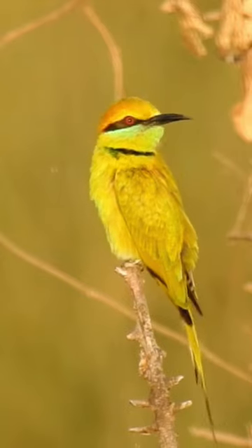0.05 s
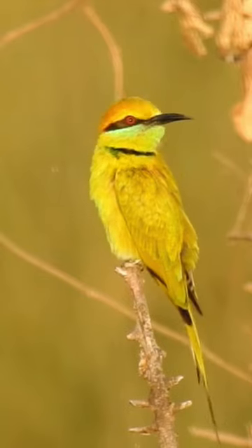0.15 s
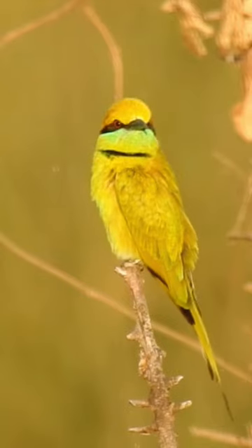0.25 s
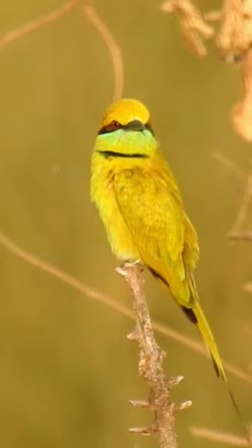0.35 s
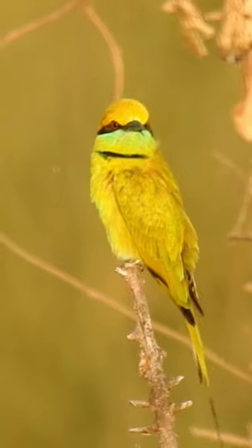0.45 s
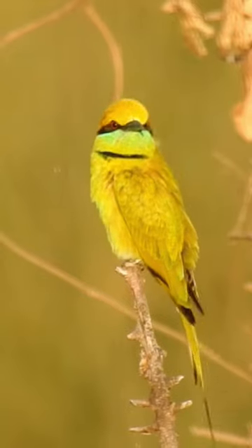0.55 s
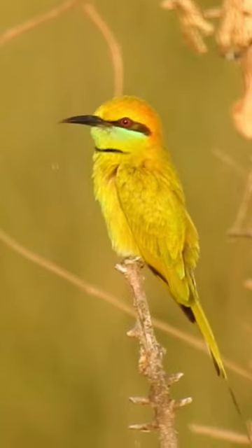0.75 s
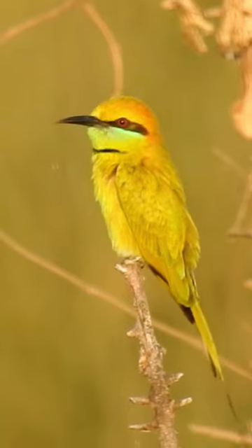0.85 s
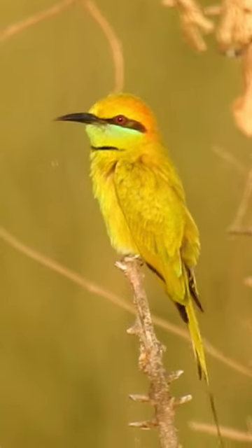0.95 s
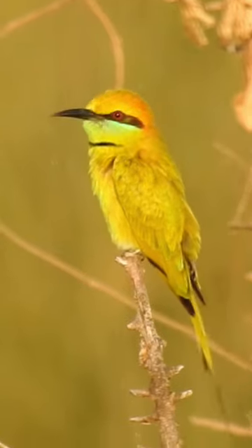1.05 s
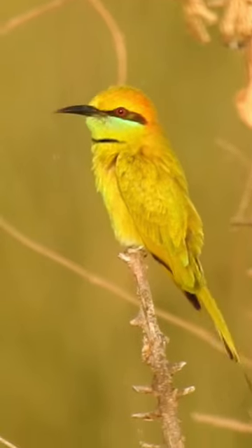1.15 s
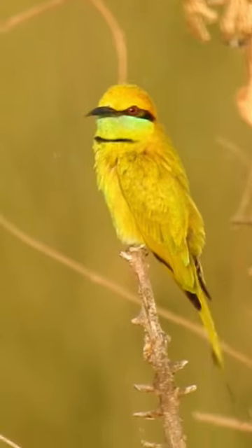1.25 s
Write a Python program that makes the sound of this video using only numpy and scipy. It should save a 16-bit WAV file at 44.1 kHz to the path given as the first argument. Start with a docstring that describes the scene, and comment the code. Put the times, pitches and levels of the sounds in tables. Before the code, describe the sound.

Outdoors, a cricket starts a high-pitched buzz, grows louder and cuts off suddenly. Gusts thump softly against the microphone, and distant crickets, faint chips from small birds and a light hiss carry on underneath.

```python
"""A cricket in the wind

A cricket scrapes its wings about 160 times a second, each stroke a short falling note near 7 kHz.
Its trill swells, slows and stops dead. Others trill farther off, and small birds chip faintly.
Behind them are a steady hiss, a breeze in the scrub, rustling grass and snapping stems.
Wind buffets the microphone with rumbles and soft thumps; faint ticks sound alongside."""
import sys
import numpy as np
from scipy import signal
from scipy.fft import rfft, irfft, next_fast_len
from scipy.io import wavfile
from scipy.ndimage import map_coordinates

SR = 44100
rng = np.random.default_rng(int(sys.argv[2]) if len(sys.argv) > 2 else 0)


def dump(signal):
    """Clip the signal to [-1, 1] and save it as 16-bit WAV at the path in sys.argv[1]."""
    limited = np.clip(np.atleast_2d(signal).T, -1, 1)
    pcm = np.round(limited * 32767).astype(np.int16)
    wavfile.write(sys.argv[1], SR, pcm)


N = 57330  # 1.3 seconds
SIDES = np.array([[1], [-1]])  # plus for left, minus for right


def amp(db):
    """Turn decibels into a number to multiply by."""
    return 10 ** (np.asarray(db) / 20)


def unit(x):
    """Scale a sound to an average strength (rms) of 1."""
    return x / np.sqrt(np.mean(x ** 2) + 1e-20)


def clock():
    """The time of each sample, in seconds."""
    return np.arange(N) / SR


def curves(rows):
    """Join a table's points with straight lines: one curve for each column after the time."""
    times, *columns = np.transpose(rows)
    return [np.interp(clock(), times, column) for column in columns]


def wobble(rate):
    """A smooth curve through `rate` random values a second."""
    return map_coordinates(rng.standard_normal(4096), [clock() * rate], mode="wrap")


def filtered(x, response):
    """Multiply each frequency in a sound by response(hz)."""
    size = next_fast_len(N + SR // 4)
    return irfft(rfft(x, size) * response(np.fft.rfftfreq(size, 1 / SR)), size)[..., :N]


def spread(mid, side, alike):
    """Mix two unrelated signals into left and right; alike = 1 makes both sides the same."""
    turn = np.arccos(np.clip(alike, -1, 1)) / 2
    return np.cos(turn) * mid + SIDES * np.sin(turn) * side


def noise(colour, alike):
    """Stereo noise of strength 1; the colour table says which frequencies are strong or weak."""
    freqs, db = np.transpose(colour)
    white = spread(*rng.standard_normal((2, N)), alike)
    return unit(filtered(white, lambda hz: amp(np.interp(np.log(hz + 1), np.log(freqs), db))))


def echoes(x, fade_s):
    """Many tiny echoes off plants, together as strong as the sound; they drop 60 dB in fade_s."""
    t = np.arange(SR // 8) / SR
    tail = rng.standard_normal((2, len(t))) * amp(-60 * t / fade_s)
    return unit(signal.fftconvolve(x[None], tail, axes=1)[:, :N]) * np.std(x)


def hiss():
    """A faint, steady hiss."""
    # tone of the hiss: f/Hz, level/dB
    colour = [(100, -33), (1000, -0.5), (2500, -0.5), (5000, 4.5), (6500, 4), (8500, -5), (10500, -2),
              (13000, -10.5), (15500, -15.5)]
    return amp(-58) * noise(colour, alike=0.067)


def breeze():
    """Air moving through the scrub makes a soft, wavering rush."""
    # strength of the breeze: t/s, level/dB
    loudness = [(0, -53.5), (.1, -57), (.2, -59), (.33, -66), (.42, -56.5), (.55, -51), (.72, -52),
                (.9, -51), (1.05, -53.5), (1.3, -52.5)]
    # its tone: f/Hz, level/dB
    colour = [(25, -15), (90, -11), (135, 4), (200, -0.5), (330, -10), (700, -11.5), (1700, -18),
              (2200, -30.5), (5000, -46)]
    return amp(curves(loudness)[0] + wobble(29.9)) * noise(colour, alike=0.42)


def rustle():
    """Dry grass rustles: noise with a quick flicker."""
    # strength of the rustle: t/s, level/dB
    loudness = [(0, -60.5), (.12, -60.5), (.19, -79), (.36, -71), (.6, -75.5), (1.05, -89), (1.1, -59),
                (1.15, -74), (1.3, -74)]
    # its tone: f/Hz, level/dB
    colour = [(300, -26), (900, 1.5), (1500, 0.5), (3000, 1), (6000, -22), (14000, -20)]
    return amp(curves(loudness)[0] + 1.5 * wobble(120)) * noise(colour, alike=0.61)


def snaps():
    """Dry stems snap faintly, each a tiny burst of noise."""
    # snapping stems: t/s, level/dB
    stems = [(0.229, -46.5), (0.636, -48), (0.763, -52.5), (.913, -54), (.992, -49), (1.097, -51.5)]
    # their tone: f/Hz, level/dB
    colour = [(1000, 5), (3000, -1.5), (5200, -1), (7000, -8), (14000, -35)]
    t, fade_s = clock(), 0.013
    bursts = sum(amp(db - 60 * np.abs(t - start) / fade_s) * (t >= start) for start, db in stems)
    return bursts * noise(colour, alike=0.5)


def swell():
    """A deep swell of air presses on both microphone openings almost equally."""
    # strength of the swell: t/s, level/dB
    loudness = [(0, -54), (.16, -50.5), (.21, -58), (.28, -50.5), (.44, -59), (.5, -65.5), (1.3, -72.5)]
    # its tone: f/Hz, level/dB
    colour = [(20, -30), (45, -4.5), (68, -2.5), (100, -12), (200, -25.5), (1000, -59)]
    return amp(curves(loudness)[0]) * noise(colour, alike=0.97)


def rumble():
    """Gusts make a lumpy rumble, different at each microphone opening."""
    # strength of the gusts: t/s, level/dB
    loudness = [(0, -68), (.21, -69), (.26, -43), (.3, -60), (.37, -37.5), (.43, -34), (.455, -44.5),
                (.49, -59), (.56, -80), (.6, -56), (.66, -60), (.72, -46.5), (.79, -52.5), (.87, -52.5),
                (.97, -60), (1.3, -92)]
    # their tone: f/Hz, level/dB
    colour = [(20, -24), (60, 3), (130, -0.5), (250, -1), (420, -11), (700, -25), (2000, -46.5),
              (6000, -51)]
    lumps_db = 3.3 * np.array([wobble(39.5), wobble(39.06)])
    return amp(curves(loudness)[0] + lumps_db) * noise(colour, alike=0.033)


def ticks():
    """Faint, sharp ticks, each gone in about a millisecond."""
    # ticks: t/s, level before dulling/dB, left minus right/dB
    tick_list = [(.2345, -39, -12), (.2455, -41, -12), (.256, -39, -12), (.2665, -40, -12), (.3945, -35, 4),
                 (.4372, -30, 3), (.448, -40, 0), (.7035, -38, -3), (1.092, -47, 0)]
    decay_s, dull_hz = .0004, 5000
    t, out = clock(), np.zeros((2, N))
    for start, db, pan_db in tick_list:
        out += amp(db + pan_db * SIDES / 2) * np.exp(-np.abs(t - start) / decay_s) * (t >= start)
    return filtered(out, lambda hz: 1 / (1 + 1j * hz / dull_hz) ** 2)


def wind_swirls():
    """Each swirl briefly shakes the air in the two openings, a little differently in each."""
    # soft thumps: t/s, half length/s, f/Hz, left level/dB, right level/dB
    thumps = [(.254, 0.017, 126, -30, -24.5), (.275, .009, 138, -26.5, -30.5),
              (.324, 0.0086, 172, -32.5, -63), (.361, 0.0062, 259, -28.5, -39),
              (.376, 0.0085, 232, -29, -34.5), (.378, 0.011, 404.5, -39, -35.5),
              (.401, 0.0079, 160, -22.5, -25), (.41, 0.0052, 180, -50, -26), (.428, 0.016, 137.4, -22, -23),
              (.438, 0.019, 179.7, -33.5, -44), (.49, 0.012, 150, -74, -37), (.595, 0.0036, 163, -58, -25),
              (.614, 0.0036, 194, -29, -46), (.705, 0.0044, 197, -50, -33.5), (.722, 0.015, 135, -32, -66),
              (.734, 0.0032, 152, -30.5, -62), (.864, 0.0051, 173, -35, -36.5),
              (.943, 0.0048, 186, -36, -66), (1.014, 0.0039, 117, -36, -27), (1.155, 0.008, 211, -48, -47)]
    out = np.zeros((2, N))
    for middle, half_length, hz, left_db, right_db in thumps:
        t = clock() - middle
        ragged = .3 * np.array([wobble(260), wobble(260)])
        side_shift = .75 * (SIDES + .5 * rng.standard_normal((2, 1)))
        bump = 1 / np.cosh(np.clip(2.07 * t / half_length, -20, 20))
        out += amp([[left_db], [right_db]]) * bump * np.sin(2 * np.pi * hz * t + ragged + side_shift)
    return out


def birds():
    """Distant birds sing short sliding notes that echo off the plants."""
    # bird notes: t/s, length/s, f/Hz, drop in pitch/Hz, level/dB
    notes = [(.293, .018, 5020, 450, -62), (.31, .018, 5270, 400, -60), (.353, .022, 5270, 850, -59),
             (.393, .024, 5270, 1000, -55), (.58, .028, 6330, 550, -53), (.612, .034, 6200, 250, -51),
             (.653, .024, 6030, 250, -58), (.688, .04, 650, -30, -47), (1.163, .024, 5220, 700, -58),
             (1.203, .016, 5100, 500, -59), (1.241, .022, 5270, 750, -59)]
    out = np.zeros(N)
    for middle, length, hz, fall_hz, db in notes:
        progress = np.clip((clock() - middle) / length, -.5, .5)
        phase = 2 * np.pi * np.cumsum(hz - fall_hz * progress) / SR + 0.34 * wobble(300)
        out += amp(db) * np.cos(np.pi * progress) * np.sin(phase)
    return out + amp(-8) * echoes(out, fade_s=.06)


def wing_strokes(cycles, share, pitch_hz, fall_hz):
    """One wing scrapes a row of teeth on the other, slowing as it goes, so each note falls."""
    stroke = np.round(cycles).astype(int)
    progress = (cycles - stroke) / np.clip(share, .2, 1)  # the note sounds from -0.5 to 0.5
    size, detune, step = rng.standard_normal((512, 3)).T  # no two strokes are quite the same
    vary_db, vary_hz, slip_rad = 0.76, 15.7, 1.05
    arch = np.sin(np.pi * np.clip(progress + .5, 0, 1)).clip(0) ** 1.46
    loudness = arch * amp(vary_db * size[stroke])
    hz = pitch_hz + vary_hz * detune[stroke] - fall_hz * np.clip(progress, -.5, .5)
    phase = 2 * np.pi * np.cumsum(hz) / SR + slip_rad * np.cumsum(step)[stroke]
    return loudness, phase


def far_crickets():
    """Four more crickets scrape their wings, blurred by echoes from the scrub."""
    # each cricket: stroke rate/Hz, f/Hz, drop in pitch/Hz, relative level/dB, left minus right/dB
    singers = [(168, 7540, 650, 0, 3), (177, 7450, 800, -1, -3), (144, 7130, 600, -4, -1),
               (159, 7560, 600, -3, -2)]
    # all of them together: t/s, level/dB
    chorus = [(0, -50), (.08, -55.5), (.16, -52.5), (.38, -50.5), (.5, -56.5), (.8, -56), (.92, -54),
              (1.1, -51.5), (1.24, -50.5), (1.3, -55.5)]
    out = np.zeros((2, N))
    for rate, hz, fall_hz, db, pan_db in singers:
        cycles = np.cumsum(rate * (1 + .015 * wobble(3.9))) / SR + rng.random()
        loudness, phase = wing_strokes(cycles, share=.7, pitch_hz=hz, fall_hz=fall_hz)
        blur = 1.35 * np.array([wobble(200), wobble(200)])
        song = loudness * np.sin(phase + blur + np.array([[0], [np.pi / 2]]))
        out += amp(db + pan_db * SIDES / 2) * (song + amp(4) * echoes(song[0], fade_s=0.036))
    return unit(out) * amp(curves(chorus)[0])


def grit(width_hz=700):
    """The roughness of a scrape: complex numbers that shake a note's strength and phase."""
    return (wobble(2 * width_hz) + 1j * wobble(2 * width_hz)) / np.sqrt(2)


def near_cricket():
    """With more effort the wing strokes grow louder and longer; then the wings stop."""
    # speed of the wings: t/s, stroke rate/Hz
    pace = [(.265, 159.1), (.4, 160.8), (.5, 164.9), (.62, 163.1), (.74, 158.4), (.88, 148.7)]
    # how hard it sings: t/s, level/dB, share of each wing cycle that sounds/0-1
    effort = [(.26, -43.5, 0.57), (.3, -41, .6), (.41, -41, 0.71), (.5, -37.5, 0.85), (.62, -35, 0.85),
              (.73, -35, 0.9), (.79, -32.5, 0.85), (.88, -33.5, 1)]
    # how alike left and right are: t/s, likeness/0-1
    likeness = [(.27, 0.9), (.5, 0.76), (.7, 0.83), (.88, 1)]
    first_stroke_s, stop_s, left_lead_rad = .2643, .8815, 0.57
    t = clock()
    level_db, share = curves(effort)
    cycles = np.cumsum(curves(pace)[0]) / SR
    cycles -= np.interp(first_stroke_s, t, cycles)
    cycles += .03 * wobble(130)  # slightly uneven timing
    last_stroke = np.round(np.interp(stop_s, t, cycles) - .5)
    singing = (cycles > -.5) * (cycles < last_stroke + .5)  # whole strokes only
    loudness, phase = wing_strokes(cycles, share, pitch_hz=6945, fall_hz=650)
    scrape = spread(1 + amp(-21) * grit(), grit(), curves(likeness)[0])
    note = np.real(scrape * np.exp(1j * (phase + left_lead_rad * SIDES / 2)))
    song = amp(level_db) * singing * loudness * note
    return song + amp(-16.5) * echoes(song.mean(0), fade_s=0.08)


def scene():
    """Animals, wind, ticks, plants and hiss together."""
    animals = near_cricket() + far_crickets() + birds()
    return animals + wind_swirls() + ticks() + snaps() + rumble() + swell() + breeze() + rustle() + hiss()


def record(dry):
    """The recorder thins the deepest bass and cuts off the highest treble."""
    bass_hz, top_hz = 49.5, 15650
    return filtered(dry, lambda hz: (hz < top_hz) * hz ** 2 / np.sqrt(hz ** 4 + bass_hz ** 4))


dry = scene()
out = record(dry)
dump(out)
```